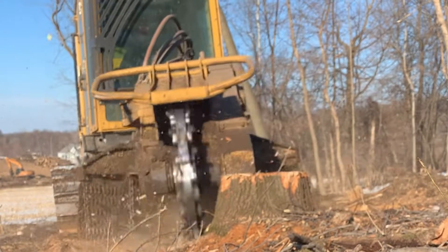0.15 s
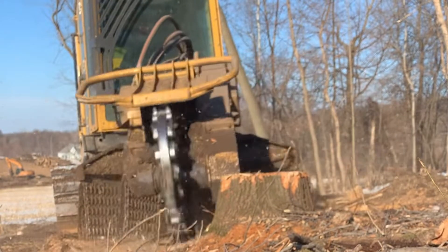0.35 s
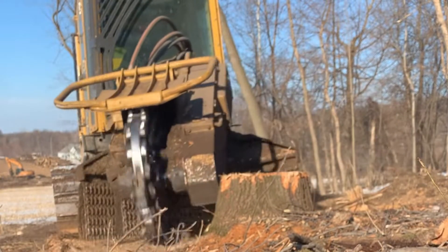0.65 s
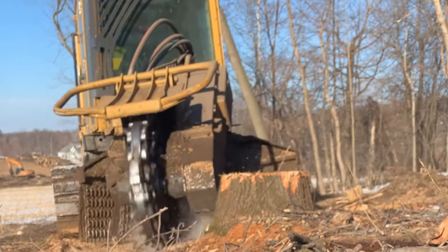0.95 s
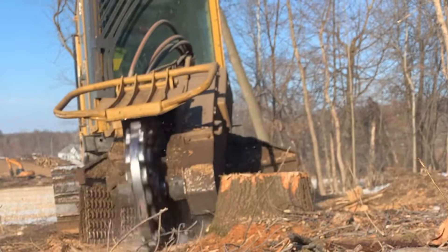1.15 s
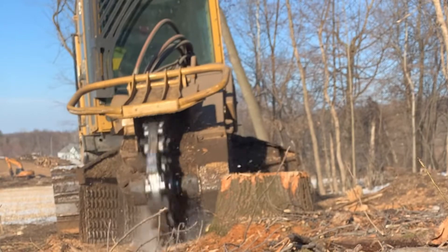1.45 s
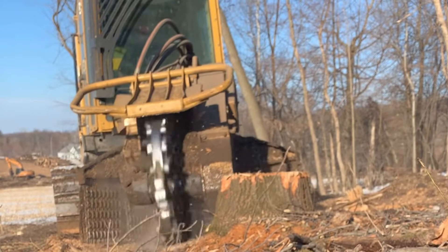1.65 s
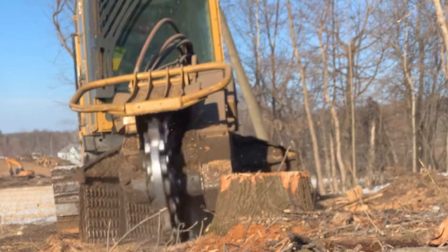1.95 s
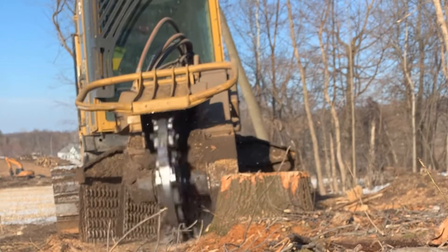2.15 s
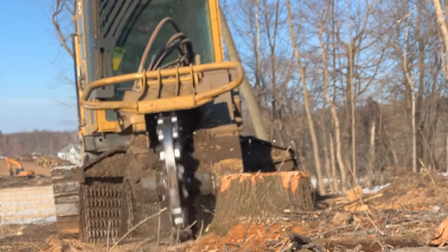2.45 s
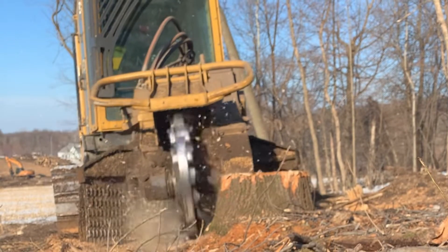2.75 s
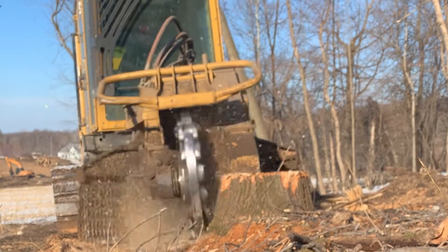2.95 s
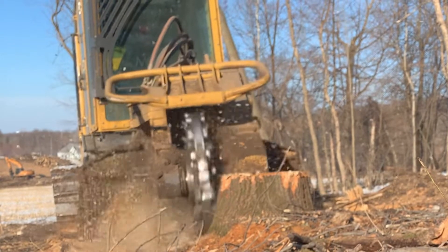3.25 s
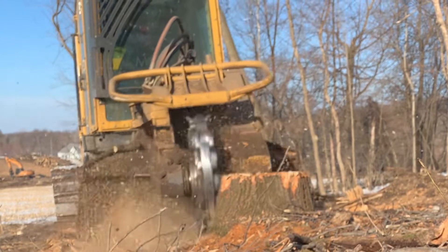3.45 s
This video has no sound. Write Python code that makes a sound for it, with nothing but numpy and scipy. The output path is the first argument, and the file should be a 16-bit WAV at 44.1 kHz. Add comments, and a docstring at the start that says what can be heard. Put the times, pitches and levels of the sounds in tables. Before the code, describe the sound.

A stump grinder chews into a tree stump with rapid, rasping bites, its diesel running underneath.

```python
"""A toothed wheel shreds and chops a tree stump: a tracked stump grinder at work outdoors.
Once a turn, four groups of teeth bite the wood; the hardest blows ring the stump, chips tick on the
steel guard, and one thrown chunk knocks down near the microphone. Behind the cutting a diesel drones
and the hydraulic motor whines. Two spaced microphone ports pick up the machine, one leading the other
by a phase that depends on frequency."""
import sys
import numpy as np
from scipy import signal
from scipy.fft import rfft, irfft, next_fast_len
from scipy.io import wavfile
from scipy.ndimage import uniform_filter1d, map_coordinates

SR = 44100
rng = np.random.default_rng(int(sys.argv[2]) if len(sys.argv) > 2 else 0)


def log_audio(samples):
    """Write samples as a 16-bit WAV file to the path given in sys.argv[1]."""
    # one column per channel
    frames = np.atleast_2d(samples).T
    # limit to full scale, then quantise
    limited = np.clip(frames, -1, 1)
    pcm = np.round(limited * 32767).astype(np.int16)
    wavfile.write(sys.argv[1], SR, pcm)


N = 158760
T = np.arange(N) / SR

# wheel turns in the wood: (time [s], shred level of tooth groups 1-4 [dB], chop over shred [dB])
TURNS = [(0.001, -26.5, -54, -60, -60, -9.5), (0.027, -35.5, -35.5, -54, -36, -6.5),
         (0.692, -36, -41, -43, -37, -1), (0.767, -29.5, -34, -28, -28.5, 5),
         (0.844, -26, -27.5, -26, -29.5, 6), (0.917, -27.5, -28.5, -27.5, -29, 6),
         (0.994, -29.5, -30.5, -27.5, -29, 5), (1.071, -28.5, -31, -29, -33, 3.5),
         (1.147, -31, -34, -31.5, -40, 1), (1.225, -29, -30, -32, -34.5, 3),
         (1.304, -27, -30, -31.5, -29.5, 4), (1.386, -28, -36, -32, -42, 3.5),
         (1.46, -27.5, -31, -35, -37.5, -1.5), (1.54, -28, -38, -35, -42, -8),
         (1.618, -34.5, -40, -48, -41, -5), (1.694, -33, -44, -32, -39, -5.5),
         (1.769, -37.5, -45, -50, -45, -19), (2.083, -31.5, -32.5, -31.5, -41, -2),
         (2.161, -28.5, -27, -29.5, -30.5, 0), (2.243, -34, -39, -53, -46, -6),
         (2.395, -35.5, -40, -39, -58, -18), (2.475, -27.5, -26, -30, -36, -4.5),
         (2.554, -23, -22.5, -30.5, -36, -6.5), (2.631, -21.5, -18, -22.5, -30, -6.5),
         (2.71, -17, -17.5, -23.5, -28.5, -6), (2.789, -17, -18, -26, -18.5, -8.5),
         (2.867, -18, -16, -21, -21, -6.5), (2.947, -16.5, -17, -23, -23.5, -7),
         (3.028, -16.5, -17, -21, -24.5, -7.5), (3.107, -17, -15.5, -19, -20.5, -7),
         (3.189, -18, -16.5, -24.5, -17.5, -4), (3.274, -19.5, -18, -26.5, -27, -7),
         (3.353, -19.5, -19.5, -22, -27, -11), (3.438, -21, -18, -24.5, -25.5, -5.5),
         (3.52, -21, -19.5, -22, -26, -8.5)]


def wheel():
    """Teeth shred the fibres (treble), chop the wood (middle) and shake stump and frame (bass)."""
    # spectra of the three layers: (frequency [Hz], level [dB])
    shred_spectrum = [(600, -120), (2200, -4.5), (3000, -10), (4500, -4.5), (6500, 2), (10500, -0.5),
                      (11500, -6.5), (16000, -13)]
    chop_spectrum = [(200, -120), (350, -1), (550, -3.5), (800, -0.5), (1150, -2.5), (1600, 2.5),
                     (2100, -11.5), (3000, -24), (6000, -120)]
    thump_spectrum = [(25, -120), (50, -3), (120, -1), (200, 1), (400, -9), (700, -15.5), (1500, -120)]
    chop_db = np.transpose(TURNS)[-1]
    cut = bites(hold_s=.017, t60_s=.075, turn_db=np.zeros(len(TURNS)), contrast=0)
    chop_cut = bites(hold_s=.015, t60_s=.072, turn_db=chop_db, contrast=1)
    flutter_db = 1.03 * wobble(150)
    shred = cut * amp(flutter_db - 2.5) * coloured(splintering(share=.2, patchy_db=2.5), shred_spectrum)
    chop_gain = chop_cut * amp(flutter_db + .3 * wobble(120) - 2)
    chop = chop_gain * coloured(splintering(share=.16, patchy_db=2), chop_spectrum)
    load = np.abs(uniform_filter1d(cut, size=round(.041 * SR))) ** .58  # the cut, smeared and flattened
    thump = amp(-17 + 3.13 * wobble(30)) * load * coloured(noise(), thump_spectrum)
    return shred + chop + thump


def bites(hold_s, t60_s, turn_db, contrast):
    """Envelope of the cut: each tooth group rises, holds and fades; contrast weakens the lesser ones."""
    spacing_s, attack_s, clear_s, gap_s = .01945, .0014, .0627, .02
    power, gap_db, t = np.zeros(N + SR), np.zeros(N), T[:SR // 8]
    shape = (1 - np.exp(-t / attack_s)) * amp(-60 * np.maximum(t - hold_s, 0) / t60_s)
    next_starts = np.append(np.transpose(TURNS)[0][1:], np.inf)
    for (start, *groups, _), extra_db, next_start in zip(TURNS, turn_db, next_starts):
        clear = start + clear_s  # the level dips as the last teeth leave the wood
        gap_db[(T > clear) & (T < min(next_start, clear + gap_s))] = -4.5
        for k, db in enumerate(groups):
            bite = amp(db + extra_db + contrast * (db - max(groups))) * shape
            power[round((start + k * spacing_s) * SR):][:len(t)] += bite ** 2
    return np.sqrt(power[:N]) * amp(uniform_filter1d(gap_db, size=SR // 400))


def splintering(share, patchy_db):
    """Noise studded with splinters (share of the power), in short patches of random pitch."""
    splinters_per_s = 2000
    splinters = (rng.random(N) < splinters_per_s / SR) * rng.standard_normal(N)
    splinters *= amp(rng.standard_normal(N))
    studded = np.sqrt(share) * unit(splinters) * [[1], [0]] + np.sqrt(1 - share) * noise()
    frames = signal.stft(studded, nperseg=128)[2]
    patches = uniform_filter1d(rng.standard_normal(frames.shape[1:]), size=4, axis=0)
    patches = uniform_filter1d(patches, size=3, axis=1)
    return signal.istft(frames * amp(patchy_db * unit(patches)), nperseg=128)[1][:, :N]


def stump_blows():
    """The hardest tooth strikes ring the stump, a little differently each time."""
    strikes = [(0.813, -18.5), (0.846, -16), (0.884, -18), (0.92, -23), (0.96, -19.5), (1.037, -20.5)]  # teeth hitting fresh wood: (time [s], level [dB])
    modes = [(757, -3, .04), (1035, -2.5, 0.062), (1586, 1.5, 0.043)]  # stump resonances: (frequency [Hz], level [dB], t60 [s])
    t, out = T[:SR // 10], np.zeros(N + SR)
    hz, mode_db, t60 = np.transpose(modes)[..., None]
    for start, db in strikes:
        louder, sharper = rng.standard_normal((2, len(modes), 1))
        decay = amp(db + mode_db + 2 * louder - 60 * t / t60)
        ring = decay * np.sin(2 * np.pi * hz * (1 + .049 * sharper) * t)
        out[round(start * SR):][:len(t)] += ring.sum(axis=0)
    return out[:N] * [[1], [.3]]


def chips():
    """Single flying chips tick on the steel guard."""
    ticks = [(0.0474, -16), (0.0989, -18.5), (0.3629, -24.5), (1.1124, -12.5), (1.6275, -9), (2.0855, -19),
             (2.2202, -9), (2.2526, -10), (2.733, -2.5)]  # chip impacts: (time [s], level [dB])
    spectrum = [(500, -120), (2000, -23.5), (7000, -1), (16000, -6.5)]  # colour of a tick: (frequency [Hz], level [dB])
    t60_s = .0045
    t, out = T[:SR // 50], np.zeros(N + SR)
    for start, db in ticks:
        out[round(start * SR):][:len(t)] += amp(db - 60 * t / t60_s) * rng.standard_normal(len(t))
    return filtered(out[:N], lambda hz: amp(along(spectrum, hz))) * [[1], [.3]]


def chunk_knock():
    """A thrown chunk lands close by: it cracks, then its hollow body sounds."""
    modes = [(310, -1.5, .03), (700, -2, .017), (1430, -5, .009), (2250, -7, .007), (3000, -10, .008),
             (3800, -6, .006)]  # chunk resonances: (frequency [Hz], level [dB], t60 [s])
    crack_s, body_lag_s, attack_s, right_lead_s = 3.2585, .0023, .001, .0003
    out = 0
    for hz, db, t60 in modes:
        start = crack_s + body_lag_s * (hz < 1000)
        t = np.maximum(T - start + [[0], [right_lead_s]], 0)
        envelope = amp(db - 60 * t / t60) * (1 - np.exp(-t / attack_s))
        polarity = -1 if hz > 500 else 1
        out += polarity * envelope * np.sin(2 * np.pi * hz * t)
    return amp(.5) * out


def diesel():
    """Six uneven firings in two crank turns drone through the pipe, with clatter, fan hiss and a hum."""
    levels = [(0, -30, -41.5), (.6, -31, -37), (1.7, -30, -38.5), (2.4, -28, -38), (2.9, -29, -30.5),
              (3.6, -29.5, -35)]  # engine loudness: (time [s], drone [dB], clatter [dB])
    cylinders = [5.5, -5.5, 3, -5.5, 8.5, 5.5]  # strength of each firing: (level [dB])
    orders = [(5, -39.5)]  # hum: (multiple of the crank rate, rms level [dB])
    # spectra of exhaust pipe, clatter and fan: (frequency [Hz], level [dB])
    pipe_spectrum = [(20, -120), (32, -14), (50, 1.5), (110, 4), (220, -1.5), (320, 0.5), (420, -3),
                     (500, -7.5), (900, -21), (2000, -120)]
    clatter_spectrum = [(250, -120), (450, -2.5), (720, 4), (1500, -4), (2200, -15.5), (8000, -48)]
    fan_spectrum = [(1500, -120), (2500, -11), (3500, 2), (5000, 6), (10500, 3.5), (11500, -2),
                    (16000, -5.5)]
    crank_hz, pulse_share = 36.57, .2
    drone_db, clatter_db = curves(levels)
    crank_turns = np.cumsum(crank_hz * (1 + .006 * wobble(2) + .03 * wobble(60))) / SR
    firing = np.floor(3 * crank_turns).astype(int)
    onsets = np.flatnonzero(np.diff(firing))
    pulses = np.zeros(N)
    pulses[onsets] = amp(np.array(cylinders)[firing[onsets] % 6] + 3 * rng.standard_normal(N)[onsets])
    exhaust = np.sqrt(pulse_share) * coloured(pulses, pipe_spectrum) * [[1], [0]]
    exhaust += np.sqrt(1 - pulse_share) * coloured(noise(), pipe_spectrum)
    hum = sum(amp(db + 2 * wobble(5.9)) * tone(k * crank_turns) for k, db in orders)
    drone = amp(drone_db + 1.12 * wobble(8.45)) * exhaust
    gate = 1 + .3 * np.cos(2 * np.pi * 3 * crank_turns)  # clatter swells with each firing
    clatter = amp(clatter_db + 1.6 * wobble(15)) * gate * coloured(noise(), clatter_spectrum)
    fan_gain = amp(-47 + wobble(3.9) + wobble(60))
    fan = fan_gain * coloured(splintering(share=.2, patchy_db=2), fan_spectrum)  # a rattling hiss
    return drone + clatter + fan + hum * [[1], [0]]


def hydraulic_motor():
    """Piston whine of the hydraulic motor, slightly unsteady."""
    running = [(0, 74, -40.5), (.35, 81.17, -36), (.7, 84, -40.5), (.78, 79, -42), (1.15, 77.91, -40.5),
               (1.3, 83.8, -40.5), (2.8, 83.76, -41), (3, 81.13, -36.5), (3.6, 80.53, -37.5)]  # speed sagging under load: (time [s], rotation rate [Hz], level [dB])
    harmonics = [(4, -2), (5, 0), (6, -7)]  # whine: (multiple of the rotation rate, level [dB])
    hz, db = curves(running)
    turns = np.cumsum(hz * (1 + .0016 * wobble(12))) / SR
    whine = sum(amp(db + level + 1.96 * wobble(7.05)) * tone(k * turns) for k, level in harmonics)
    return whine * [[1], [0]]


def microphone_ports(pair):
    """Two spaced ports turn a (direct, scattered) pair into left and right."""
    likeness = [(50, .985), (350, .93), (700, .85), (1500, .96), (3000, .6), (4500, .975), (15000, .96)]  # how alike the ports sound: (frequency [Hz], likeness [0-1])
    right_lead = [(0, 0), (200, .2), (500, .5), (1000, 1.1), (2000, 3.14), (2500, 4.6), (3700, 4.6),
                  (4650, 3.14), (6900, 0), (13150, -9.42), (17500, -15.7)]  # lead of the right port: (frequency [Hz], phase [rad])
    left_boost = [(60, 0), (170, 1.8), (600, 0)]  # left port over right: (frequency [Hz], level [dB])

    def width(hz):
        angle = np.arccos(along(likeness, hz)) / 2
        return np.array([np.cos(angle), np.sin(angle)])

    def balance_and_lead(hz):
        balance = amp(np.outer([.5, -.5], along(left_boost, hz)))
        phase = np.outer([-.5, .5], np.interp(hz, *np.transpose(right_lead)))
        return balance * np.exp(1j * phase)

    mid, side = filtered(pair, width)
    return filtered(np.array([mid + side, mid - side]), balance_and_lead)


def amp(db):
    """Decibels to gain."""
    return 10 ** (np.asarray(db) / 20)


def unit(x):
    """x scaled to rms 1."""
    return x / np.sqrt(np.mean(x ** 2) + 1e-20)


def tone(cycles):
    """A sine of rms 1."""
    return np.sqrt(2) * np.sin(2 * np.pi * cycles)


def along(points, hz):
    """(frequency [Hz], value) points interpolated on a log axis."""
    knots_hz, values = np.transpose(points)
    return np.interp(np.log(hz + 1), np.log(knots_hz + 1), values)


def curves(rows):
    """One value per sample for each column after the time."""
    times, *columns = np.transpose(rows)
    return [np.interp(T, times, column) for column in columns]


def wobble(rate):
    """A smooth random curve, rate knots a second."""
    return map_coordinates(rng.standard_normal(int(N * rate / SR) + 4), [T * rate])


def filtered(x, response):
    """x through a complex frequency response."""
    size = next_fast_len(N + SR // 2)
    return irfft(rfft(x, size) * response(np.fft.rfftfreq(size, 1 / SR)), size)[..., :N]


def coloured(x, spectrum):
    """x shaped by a spectrum, at rms 1."""
    return unit(filtered(x, lambda hz: amp(along(spectrum, hz))))


def noise():
    """Two unrelated white noises: the direct sound and its scattered share."""
    return rng.standard_normal((2, N))


def scene():
    """Machine and wood as heard at the microphone ports; the chunk lands near them."""
    grinder = diesel() + hydraulic_motor() + wheel() + stump_blows() + chips()
    return microphone_ports(grinder) + chunk_knock()


def record(dry):
    """The recorder passes nothing above its band limit."""
    return filtered(dry, lambda hz: hz < 15850)


dry = scene()
out = record(dry)
log_audio(out)
```